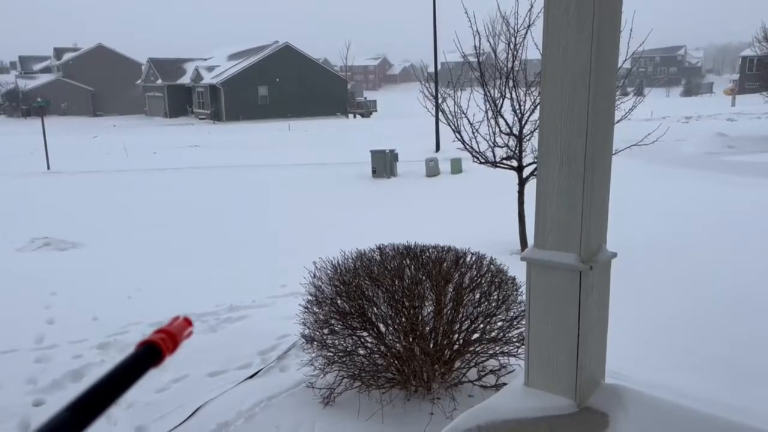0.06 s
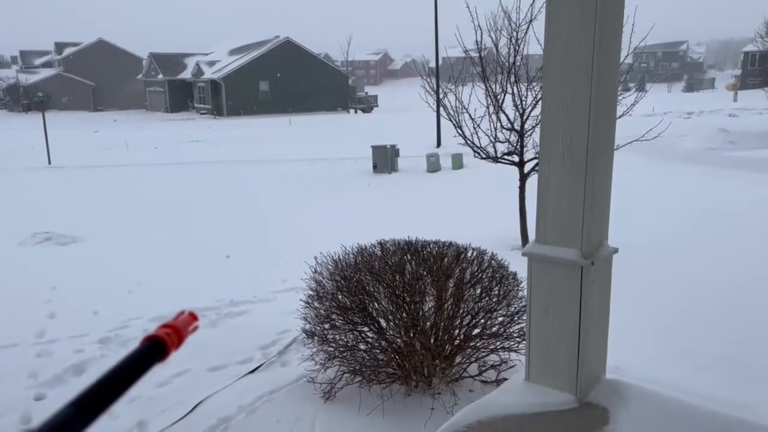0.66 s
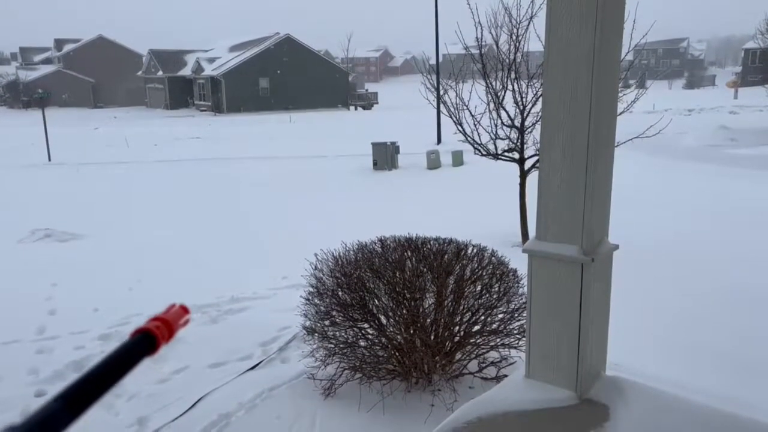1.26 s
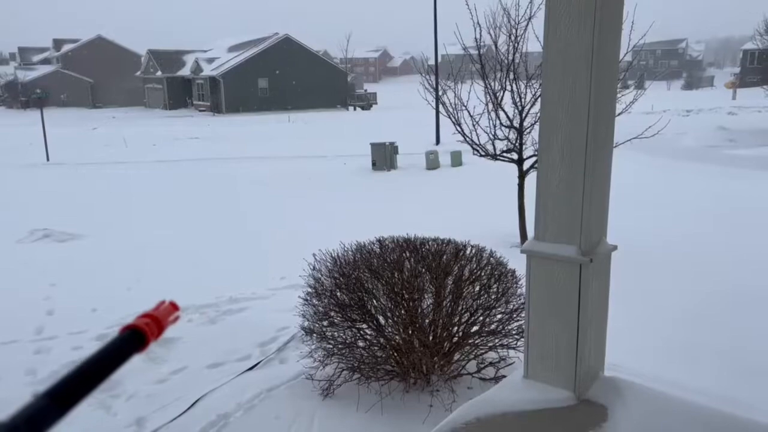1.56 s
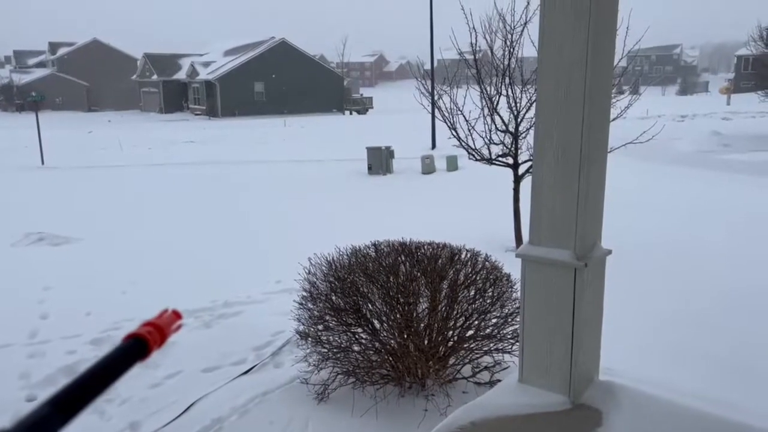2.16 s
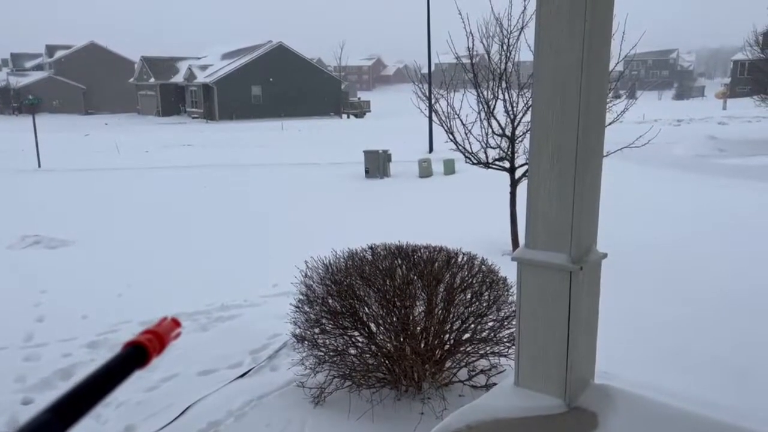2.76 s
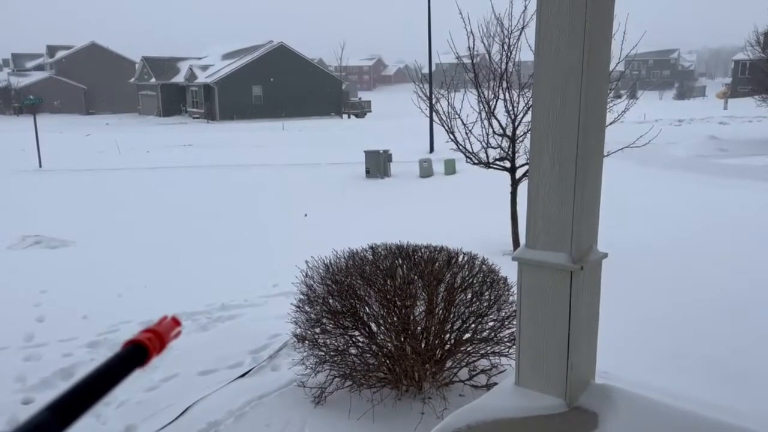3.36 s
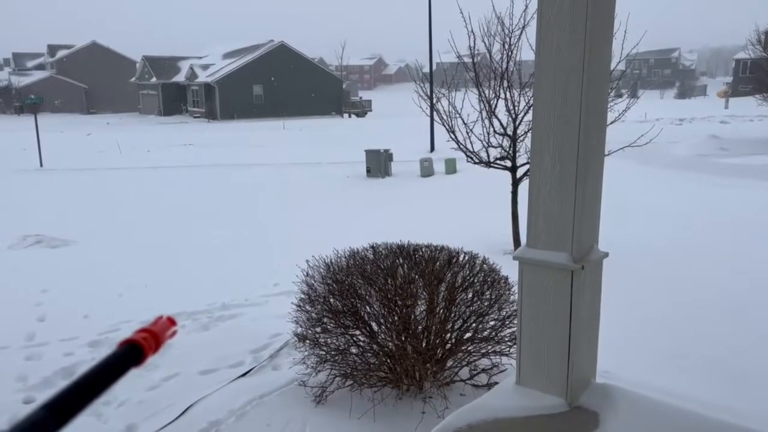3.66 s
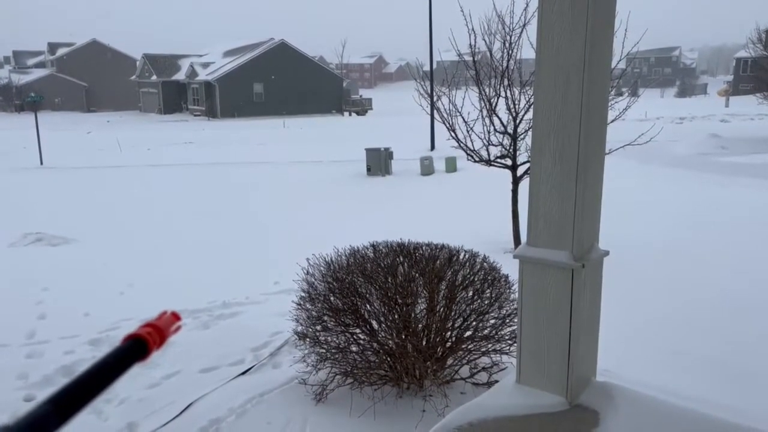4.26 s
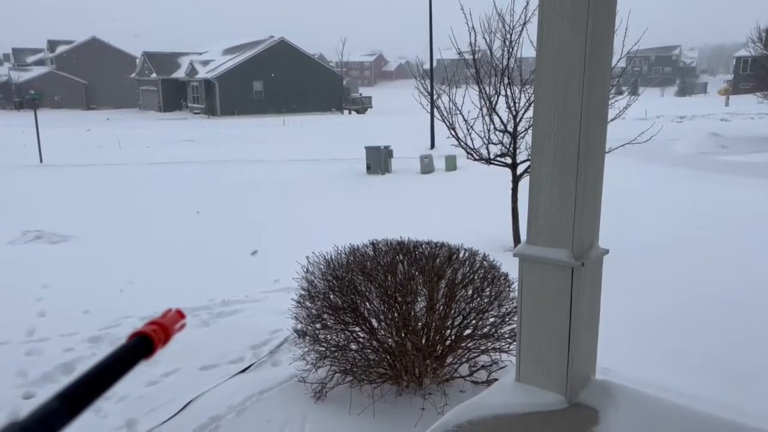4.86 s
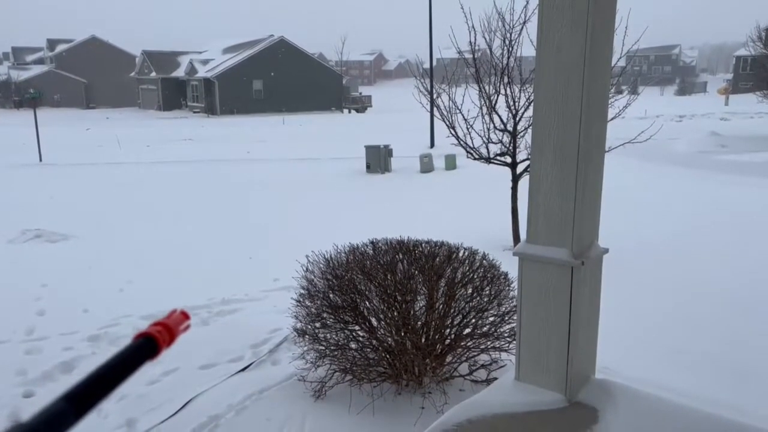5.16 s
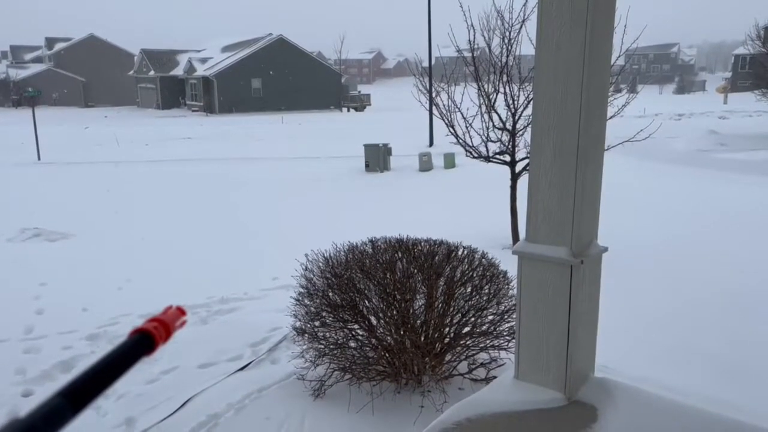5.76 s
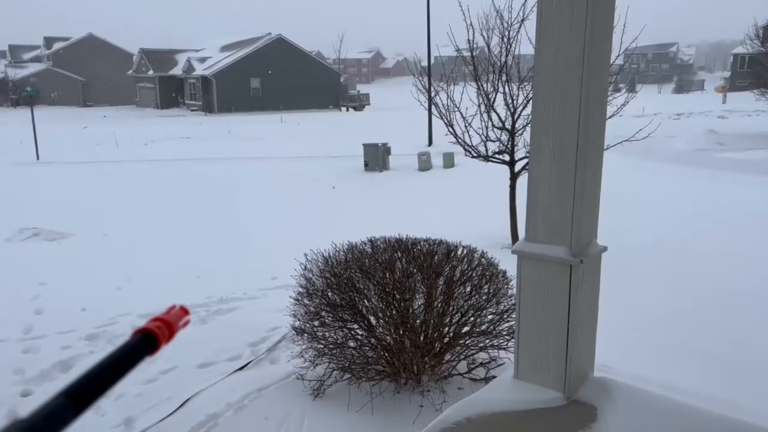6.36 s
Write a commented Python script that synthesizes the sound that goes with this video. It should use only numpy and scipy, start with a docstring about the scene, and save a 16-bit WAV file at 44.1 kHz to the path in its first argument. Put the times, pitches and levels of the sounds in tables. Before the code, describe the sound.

A close battery-powered airsoft rifle fires four single shots, then whirring automatic bursts on a porch, with pellets cracking on a hard target.

```python
"""A battery-powered airsoft rifle fires from a porch over a snowy yard: single shots, then full-auto bursts.
Each cycle the gears wind back a spring piston and let it go; it slams home with a puff of air and a
thump in the stock. The trigger clicks in and out, loose parts tick, and each pellet cracks on something
hard a third of a second after its shot. The porch echoes over a faint far hum and light wind."""
import sys
import numpy as np
from scipy import signal
from scipy.fft import rfft, irfft
from scipy.io import wavfile
from scipy.ndimage import uniform_filter1d

SR = 44100
rng = np.random.default_rng(int(sys.argv[2]) if len(sys.argv) > 2 else 0)


def digitize_waveform(pressure):
    """Quantize a signal to 16-bit integers and store it at the path in sys.argv[1].

    Rows of a 2-D input are taken as channels; values are limited to [-1, 1].
    """
    field = np.atleast_2d(pressure).T
    bounded = np.clip(field, -1, 1)
    quanta = np.round(bounded * 32767).astype(np.int16)
    wavfile.write(sys.argv[1], SR, quanta)


N = 286644
TIME_S = np.arange(N) / SR
AGE_S = np.arange(8192) / SR


def amp(db):
    """Decibels to gain."""
    return 10 ** (np.asarray(db) / 20)


def unit(x):
    """Scales to energy 1."""
    return x / np.sqrt(np.sum(x ** 2) + 1e-20)


def read(points, hz):
    """Table lookup on a log-frequency axis."""
    f, value = np.transpose(points)
    return np.interp(np.log(hz + 1), np.log(f + 1), value)


def add(mix, s, sound):
    """Mixes a sound in at time s."""
    start = round(s * SR)
    sound = sound[max(-start, 0):]
    part = mix[max(start, 0):][:len(sound)]
    part += sound[:len(part)]


def delayed(x, s):
    """Delays by s seconds."""
    return np.pad(x, (round(s * SR), 0))[:N]


def highpass(x, hz, order=2):
    """Butterworth high-pass."""
    return signal.sosfilt(signal.butter(order, hz, "highpass", fs=SR, output="sos"), x)


def response(points, peaks=()):
    """Minimum-phase impulse response from a spectrum and resonances."""
    hz = abs(np.fft.fftfreq(len(AGE_S), 1 / SR))
    db = read(points, hz) + sum(lift / (1 + (2 * (hz - f) / width) ** 2) for f, width, lift in peaks)
    log_spectrum = np.conj(signal.hilbert(np.log(amp(db))))
    return np.fft.ifft(np.exp(log_spectrum)).real[:len(AGE_S) // 2]


def through(x, impulse):
    """Convolves, keeping the length."""
    return signal.fftconvolve(x, impulse)[:len(x)]


def smooth_noise(samples):
    """Moving-average noise, RMS 1."""
    return np.sqrt(N) * unit(uniform_filter1d(rng.standard_normal(N), size=samples))


def impact(body, t60_s, chatter):
    """An impulse plus dying noise, filtered by a body."""
    contact = chatter * unit(rng.standard_normal(len(AGE_S)) * amp(-60 * AGE_S / t60_s))
    contact[0] += 1
    return unit(through(contact, body))


def ring(hz, t60_s):
    """One damped mode."""
    return np.sin(2 * np.pi * hz * AGE_S) * amp(-60 * AGE_S / t60_s)


def slam_times(first_s, burst_s, slow_s, drift_s, cycle_s=.05265, settle_s=.036):
    """Piston hits in one pull: the cycle starts slow, settles, drifts; a last hit as the motor runs out."""
    times, held_s = [], 0
    while held_s < burst_s - cycle_s / 2:
        times.append(first_s + held_s)
        held_s += cycle_s + slow_s * np.exp(-held_s / settle_s) + drift_s * (held_s / burst_s) ** 3
    return times + [first_s + burst_s]


# Trigger pulls: (switch on [s], first slam [s], burst length [s], first-cycle excess [s],
# cycle drift [s], switch level [dB], gear level [dB], slam level [dB], thump level [dB])
TRIGGER_PULLS = [(-.115, -.048, 0, 0, 0, -14, -20, -14, -24), (.728, .7855, 0, 0, 0, -15.5, -17, -12, -26),
                 (1.537, 1.585, 0, 0, 0, -14, -17.5, -15, -25.5),
                 (2.417, 2.471, 0, 0, 0, -14.5, -17.5, -13.5, -27),
                 (3.017, 3.0695, .688, .0157, .0092, -15, -23.5, -14.7, -29.7),
                 (4.413, 4.4839, 0, 0, 0, -26.5, -26, -14, -32),
                 (4.799, 4.8439, .5536, .0148, .0025, -18, -24, -14.5, -29.5),
                 (5.952, 5.9981, .3994, .021, -.0081, -25, -26.5, -14.3, -31)]
# Gear grind spectrum: (frequency [Hz], level [dB])
GRIND_SPECTRUM = [(60, -29.5), (250, -6), (600, 0.5), (1000, -7), (1600, -4), (2300, -2.5), (3400, -11.5),
                  (5000, 1.5), (6600, -6), (8000, -7.5), (10000, -11.5), (13500, -15), (16000, -64.5)]
# Gearbox resonances: (frequency [Hz], width [Hz], lift [dB])
GEARBOX_PEAKS = [(657.7, 24, 10), (1420, 160, 7), (2830, 220, 3), (2990, 940, 11.5), (4042, 560, 12),
                 (6680, 720, 10.5)]


def gears(mesh_hz=2880, pinion_teeth=10, spin_up_s=.024, coast_s=.088, wobble=.097, alike=.083):
    """Teeth whine and grind at motor speed, harder as the spring winds; one row per gearbox side."""
    slack_db, undriven_db, wound_db, released_db, grit_db = -3, -1.5, 3, -4, 2
    speed, level, strain_db = np.zeros((3, N))
    for on_s, first_s, burst_s, slow_s, drift_s, _, gear_db, _, _ in TRIGGER_PULLS:
        off_s = first_s + burst_s - .004  # current cut just before the last slam
        run_up = 1 - np.exp(-np.maximum(TIME_S - on_s, 0) / spin_up_s)
        turning = run_up * np.clip(1 - (TIME_S - off_s) / coast_s, 0, 1)
        speed += turning
        slack = np.clip((first_s - TIME_S) / (first_s - on_s), 0, 1)
        undriven = np.clip((TIME_S - off_s) / .026325, 0, 1)  # over half a cycle
        level += amp(gear_db + slack_db * slack ** 2 + undriven_db * undriven) * turning ** .62
        for s in slam_times(first_s, burst_s, slow_s, drift_s):
            since_s = TIME_S - s + .011  # zero as the last tooth frees the piston
            winding_db = wound_db * np.exp(-abs(since_s) / .044)
            relief_db = released_db * np.exp(-abs(since_s) / .037)
            strain_db += np.where(since_s < 0, winding_db, relief_db)
    phase = 2 * np.pi * np.cumsum(mesh_hz * speed * (1 + wobble * smooth_noise(150))) / SR
    whine = .27 * (np.sin(phase) + .95 * np.sin(2 * phase))
    bite = np.sqrt(N) * unit(amp(grit_db * smooth_noise(40)))  # teeth bite unevenly
    left, other = rng.standard_normal((2, N)) * bite * (1 + .11 * np.cos(phase / pinion_teeth))
    right = alike * left + np.sqrt(1 - alike ** 2) * other
    gearbox = unit(response(GRIND_SPECTRUM, GEARBOX_PEAKS))
    return np.array([through((grind + whine) * level * amp(strain_db), gearbox)
                     for grind in (left, right)])


def shots(scatter_db=.32, slow_thump_db=-.5):
    """Yields (time [s], slam [dB], thump [dB]); a burst's slow first and last rounds thump less."""
    for _, first_s, burst_s, slow_s, drift_s, _, _, slam_db, thump_db in TRIGGER_PULLS:
        times = slam_times(first_s, burst_s, slow_s, drift_s)
        for s in times:
            slow = len(times) > 1 and s in (times[0], times[-1])
            offset_db = scatter_db * rng.standard_normal()
            yield s, slam_db + offset_db, thump_db + offset_db + slow * slow_thump_db


def barrel(start_hz=450, end_hz=110, travel_s=.014):
    """The air column behind the pellet lengthens, so its note drops."""
    progress = AGE_S[AGE_S < travel_s] / travel_s
    hz = start_hz + (end_hz - start_hz) * progress
    return unit(-np.sin(2 * np.pi * np.cumsum(hz) / SR) * np.sin(np.pi * progress))


# Hollow stock modes: (frequency [Hz], level [dB], t60 [s])
STOCK_MODES = [(128, 6, 0.09), (235, -22, 0.16), (281.5, -5.5, 0.22), (402.5, -6, 0.27), (666, -24.5, .1),
               (840, 5.5, 0.054)]
# Piston slam, muzzle pop and air puff spectra: (frequency [Hz], level [dB])
SLAM_SPECTRUM = [(100, -5), (600, -18), (1400, -11.5), (2050, -10), (2750, -1), (3400, -5.5), (4600, -9),
                 (7000, -30.5), (15000, -51.5)]
MUZZLE_SPECTRUM = [(60, -16), (400, -10), (850, 0), (1450, -5), (2000, -4.5), (2700, -8.5), (3500, -4),
                   (5500, -12), (8000, -17), (15000, -48.5)]
PUFF_SPECTRUM = [(25, -38), (70, -24.5), (120, -9), (200, -20), (340, -6), (600, -25), (1500, -40)]


def piston(launch_lead_s=.00813, pop_delay_s=.0033, latch_delay_s=.013):
    """The piston drives air down the barrel and slams home; the muzzle pops, the latch drops back."""
    out = np.zeros(N)
    slam, muzzle = response(SLAM_SPECTRUM), response(MUZZLE_SPECTRUM)
    puff, gearbox = unit(response(PUFF_SPECTRUM)), response(GRIND_SPECTRUM, GEARBOX_PEAKS)
    stock = -unit(sum(amp(db) * ring(hz, t60_s) for hz, db, t60_s in STOCK_MODES))
    for s, slam_db, thump_db in shots():
        add(out, s - .005, amp(slam_db + 19) * impact(gearbox, t60_s=.022, chatter=4))
        add(out, s, amp(slam_db + 25) * impact(slam, t60_s=.035, chatter=.9))
        add(out, s + pop_delay_s, amp(slam_db + 25.5) * impact(muzzle, t60_s=.039, chatter=2.3))
        add(out, s + latch_delay_s, amp(slam_db + 13.5) * impact(gearbox, t60_s=.027, chatter=1.6))
        add(out, s - launch_lead_s, amp(thump_db + 30.5) * stock)
        add(out, s, amp(thump_db + 28) * stock)
        add(out, s - .009, amp(1.734 * thump_db + 51) * barrel())  # air rush grows faster than thump
        add(out, s - .002, amp(thump_db + 18) * puff)
    return highpass(out, hz=75.7)  # a small body radiates no deep bass


# Porch decay: (frequency [Hz], t60 [s])
PORCH_DECAY = [(100, 0.48), (500, 0.27), (2500, 0.16), (6000, 0.18), (14000, 0.14)]


def porch(x, build_s=.00095, echoes_per_s=5000):
    """Wall, roof and posts scatter echoes, different on each side; bass escapes into the yard."""
    taps = rng.standard_normal((2, SR // 2)) * (rng.random((2, SR // 2)) < echoes_per_s / SR)
    hz, t, bands = signal.stft(taps, SR, nperseg=256)
    bands = bands * amp(-60 * t / read(PORCH_DECAY, hz)[:, None]) * (1 - np.exp(-t / build_s))
    _, tails = signal.istft(bands, SR, nperseg=256)
    trapped = highpass(x, hz=205)
    return np.array([through(trapped, unit(tail)) for tail in tails])


# Far hum and wind hiss spectra: (frequency [Hz], density [dB])
HUM_SPECTRUM = [(15, -31), (35, -19), (48, -10), (58, 3), (72, -10), (95, -13.5), (122, -9), (170, -24.5),
                (300, -32.5), (900, -60)]
WIND_SPECTRUM = [(100, -4), (300, 2.5), (700, 3.5), (1500, 1), (3000, 0), (4800, -2.5), (6000, -7),
                 (8000, -28.5), (12000, -27.5), (16000, -53.5)]
# Hum and wind stereo likeness: (frequency [Hz], correlation [0-1])
AIR_CORRELATION = [(100, 0.84), (300, 0.6), (700, .1), (15000, 0.4)]
# Hum and wind envelopes: (time [s], hum level [dB], wind level [dB])
AIR_LEVELS = [(0, -47, -63.5), (1.2, -54.5, -64.5), (3.0, -52, -62.5), (4.25, -63.5, -66.5),
              (6.5, -65.5, -68)]


def hum_and_wind():
    """A far, wavering hum under a thin hiss of light wind, both shaped noise."""
    hz = np.fft.rfftfreq(N, 1 / SR)
    left, other = rfft(rng.standard_normal((2, N)))
    alike = read(AIR_CORRELATION, hz)
    sides = np.array([left, alike * left + np.sqrt(1 - alike ** 2) * other])
    hum, wind = (np.sqrt(2 * N) * unit(irfft(sides * amp(read(spectrum, hz)), N))
                 for spectrum in (HUM_SPECTRUM, WIND_SPECTRUM))
    s, hum_db, wind_db = np.transpose(AIR_LEVELS)
    return hum * amp(np.interp(TIME_S, s, hum_db)) + wind * amp(np.interp(TIME_S, s, wind_db))


def handling(ticks_per_s=22, floor_db=-44, spread_db=4):
    """The plastic body ticks and creaks faintly in the hands."""
    ticks = rng.random(N) < ticks_per_s / SR
    level_db = floor_db + spread_db * np.minimum(rng.exponential(1, N), 2.5)
    creak = impact(response(GRIND_SPECTRUM, GEARBOX_PEAKS), t60_s=.023, chatter=4)
    return through(ticks * amp(level_db), creak)


# Trigger springing back: (time [s], level [dB], relative knock [dB], ring [Hz])
TRIGGER_RELEASES = [(0.071, -11.5, -22, 2300), (0.91, -5, -21.5, 5460), (1.705, -8, -27.5, 2820),
                    (2.593, -5, -27, 5700), (4.599, -9, -24, 2220)]
# Loose parts knocking: (time [s], level [dB])
LOOSE_PARTS = [(0.15, -29), (0.644, -29.5), (0.687, -35.5), (0.974, -40), (1.105, -30.5), (1.425, -31),
               (1.479, -38.5), (1.781, -21.5), (2.348, -39)]
# Trigger snap and hollow grip spectra: (frequency [Hz], level [dB])
SNAP_SPECTRUM = [(200, -23.5), (1100, -11), (2200, -7.5), (3400, -9.5), (5500, -5.5), (7000, -11.5),
                 (10000, -28), (15000, -33)]
GRIP_SPECTRUM = [(80, -45.5), (280, -15), (620, -0.5), (1000, -5), (2000, -8.5), (6000, -50.5)]


def clicks(switch_hz=2900, switch_knock_db=-11.5, loose_hz=2450, loose_knock_db=-16.5, seat_s=.0145):
    """Switch, trigger, loose parts: each click has a soft noisy lead-in, a snap and a knock on the grip."""
    out, snap, grip = np.zeros(N), response(SNAP_SPECTRUM), response(GRIP_SPECTRUM)
    switches = [(s, db, switch_knock_db, switch_hz) for s, _, _, _, _, db, *_ in TRIGGER_PULLS]
    rattles = [(s, db, loose_knock_db, loose_hz) for s, db in LOOSE_PARTS]
    for s, db, knock_db, hz in switches + TRIGGER_RELEASES + rattles:
        latch = impact(snap, t60_s=.012, chatter=2.5)
        lead_in_hiss = impact(snap, t60_s=.11, chatter=7.5)
        add(out, s - .006, amp(db - 1.5) * lead_in_hiss)
        add(out, s, amp(db + 11) * impact(snap, t60_s=.053, chatter=.89))
        add(out, s + .0016, amp(db + 10) * latch)
        add(out, s + .001663, amp(db + 8) * unit(ring(hz, t60_s=.012)))
        add(out, s + .001, amp(db + knock_db + 31) * impact(grip, t60_s=.077, chatter=1.4))
        add(out, s + seat_s, amp(db + knock_db + 23) * impact(grip, t60_s=.026, chatter=1.4))
    return out


# Pellet hits, one row per pull: (flight [s], clack [dB], ring [Hz], knock [dB], crack [dB])
PELLET_HITS = [(.331, -36, 5000, -36, -29.5), (.3335, -23, 5850, -39, -28.5), (.332, -9, 4060, -51, -30.5),
               (.334, -20, 4230, -39, -31.5), (.329, -31, 5400, -50.5, -41.5), (.331, -35, 5000, -50, -42),
               (.333, -30, 5700, -49.5, -41), (.331, -40, 4040, -60, -45)]
# Pellet crack and target knock spectra: (frequency [Hz], level [dB])
CRACK_SPECTRUM = [(300, -33), (2000, -3.5), (5500, 5.5), (7800, -5), (10200, 4.5), (12500, -0.5),
                  (14500, -6), (16000, -17.5)]
TARGET_SPECTRUM = [(200, -26), (400, 0), (650, -6.5), (1000, 5), (1500, -3), (2500, -5), (5000, -13),
                   (12000, -39.5)]


def pellets():
    """Each hard plastic bead cracks on a target, which knocks and clacks in two close modes."""
    out, crack, target = np.zeros(N), response(CRACK_SPECTRUM), response(TARGET_SPECTRUM)
    for pull, (flight_s, clack_db, hz, knock_db, crack_db) in zip(TRIGGER_PULLS, PELLET_HITS):
        _, first_s, burst_s, slow_s, drift_s, *_ = pull
        clack = unit(ring(hz, t60_s=.009) - ring(.9 * hz, t60_s=.009))
        for s in np.add(slam_times(first_s, burst_s, slow_s, drift_s), flight_s):
            add(out, s + .001526, amp(crack_db + 29) * impact(crack, t60_s=.041, chatter=15))
            add(out, s + .0019, amp(clack_db + 7.5) * clack)
            add(out, s + .0013, amp(knock_db + 33.5) * impact(target, t60_s=.11, chatter=7.3))
    return out


def yard(hits):
    """Pellet hits arrive direct, then duller off a wall and the porch."""
    direct = hits * amp([[0], [-2.5]])
    dull = through(hits, response([(300, -16.5), (3000, 4.5), (6000, -1), (12000, -8)]))
    wall = np.array([delayed(dull, s=.0335), delayed(dull, s=.0345)])
    return direct + amp(-9.5) * wall + amp(-.5) * porch(dull)


# Shadowing of the rifle on the right side: (frequency [Hz], gain [dB])
RIGHT_SHADOW = [(100, -1.5), (400, -4.5), (700, -5.5), (1300, -9.5), (2400, -2.5), (3800, -5), (5500, -15),
                (7500, -15), (9500, 1), (15000, -0.5)]


def scene():
    """The rifle is close on the left, so the right side hears it later and duller."""
    left, right = gears() + piston() + clicks() + handling()
    shadow = response(RIGHT_SHADOW)
    rifle = np.array([left, delayed(through(right, shadow), s=.00037)])
    echoes = porch(left)
    echoes[1] = through(echoes[1], shadow) * amp(9)
    return rifle + amp(-15) * echoes + yard(pellets()) + hum_and_wind()


def record(dry):
    """The microphone sheds deep bass and rounds the loudest peaks; then a band limit."""
    ceiling, edge_hz = .93, 15900
    thin = highpass(dry, hz=50, order=4)
    rounded = thin / (1 + (thin / ceiling) ** 4) ** .25
    lowpass = signal.firwin(255, edge_hz, window=("kaiser", 9), fs=SR)
    return signal.oaconvolve(rounded, lowpass[None], "same")


dry = scene()
out = record(dry)
digitize_waveform(out)
```